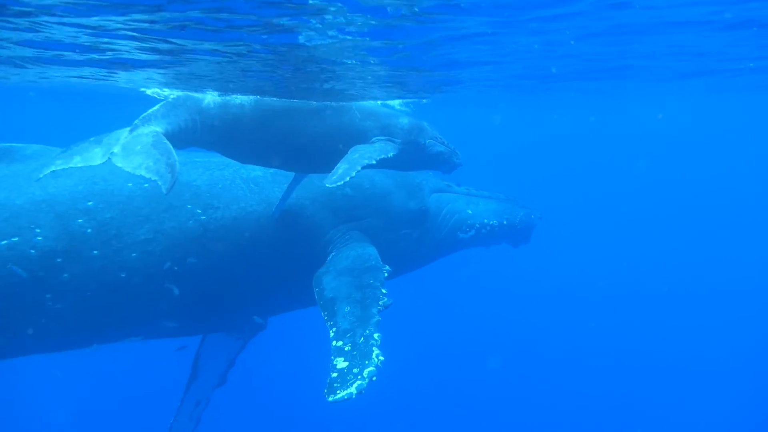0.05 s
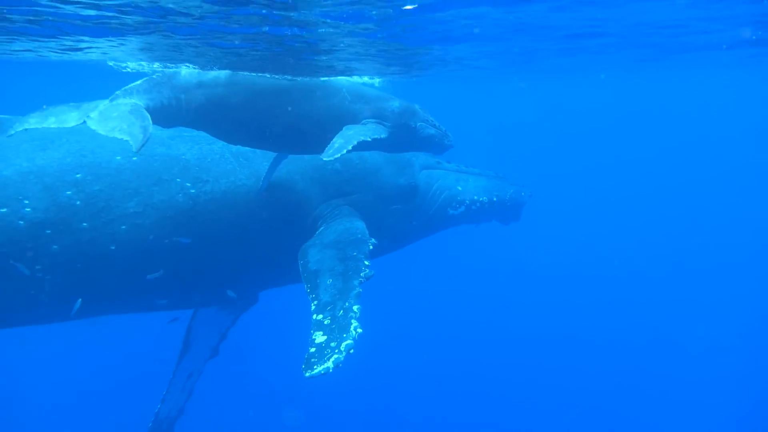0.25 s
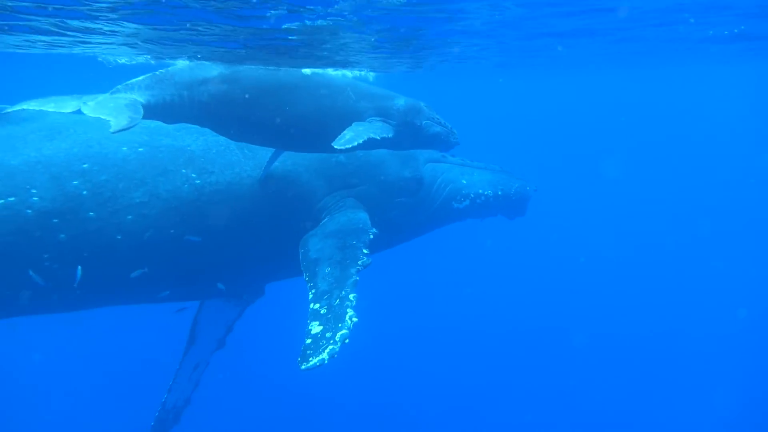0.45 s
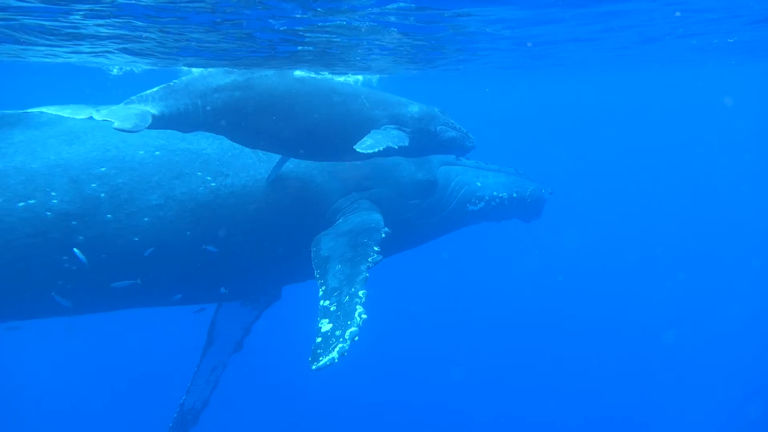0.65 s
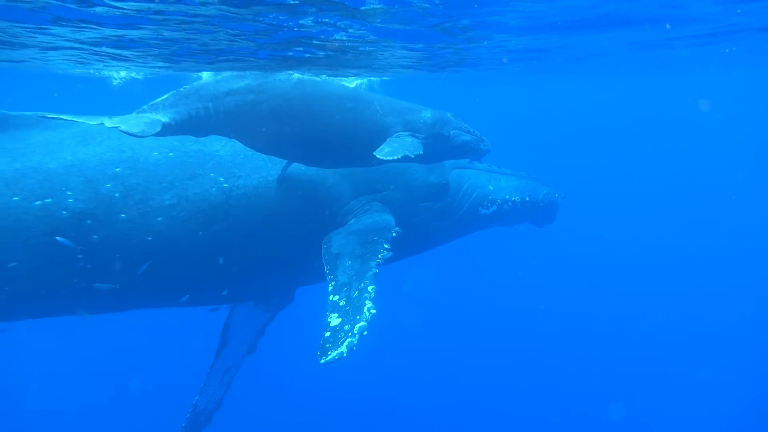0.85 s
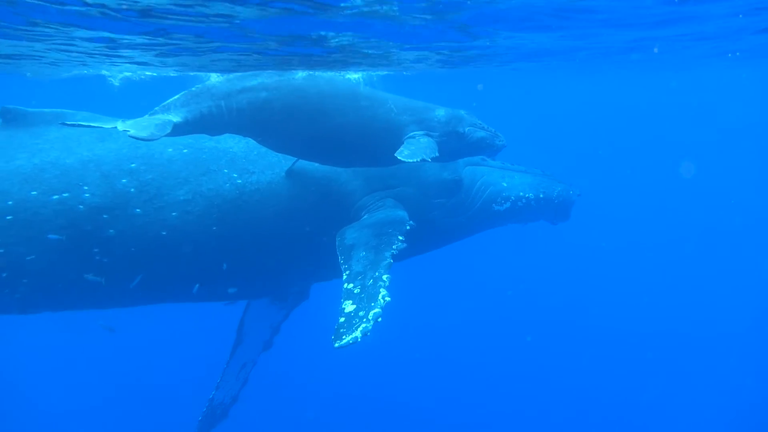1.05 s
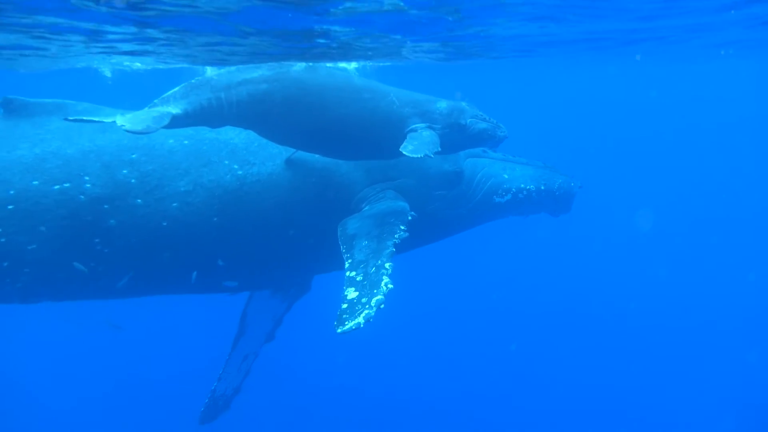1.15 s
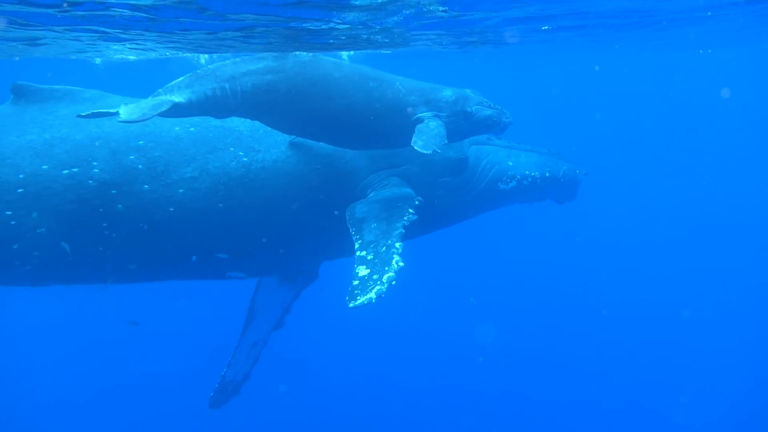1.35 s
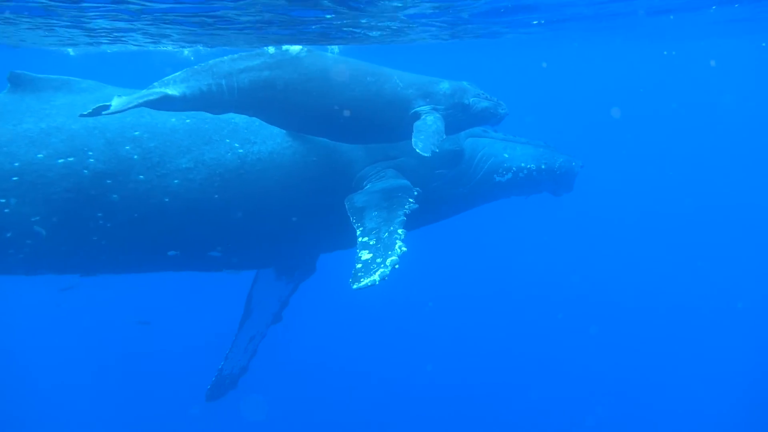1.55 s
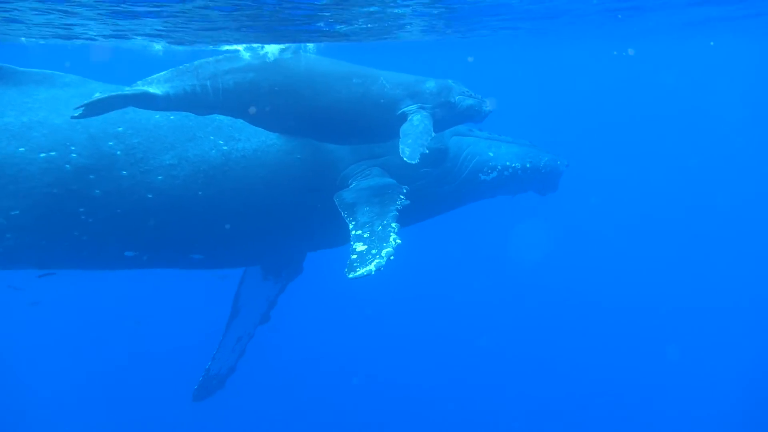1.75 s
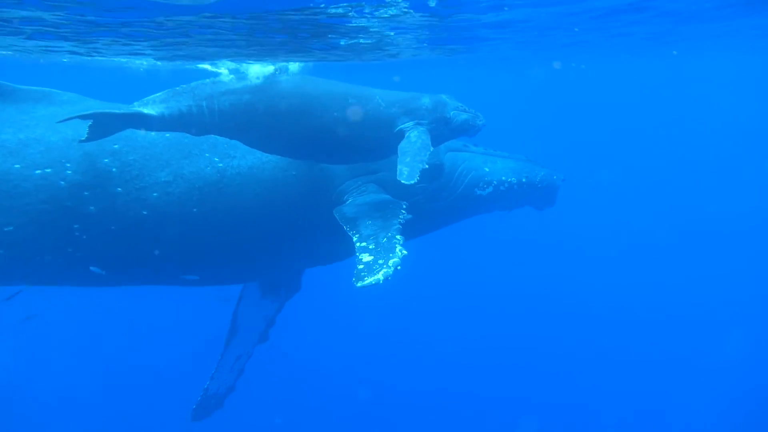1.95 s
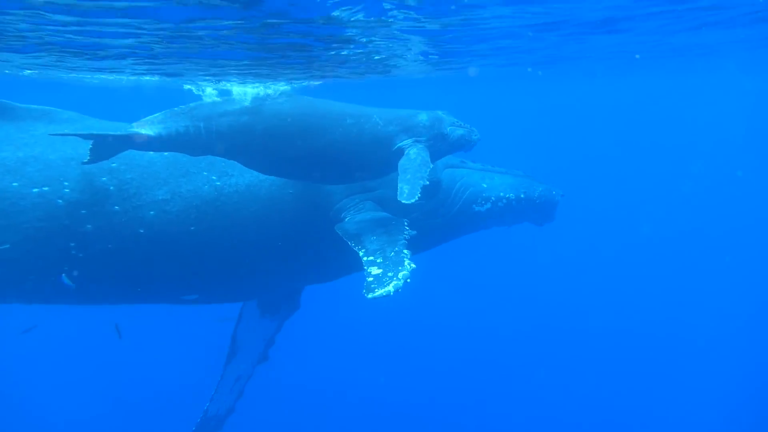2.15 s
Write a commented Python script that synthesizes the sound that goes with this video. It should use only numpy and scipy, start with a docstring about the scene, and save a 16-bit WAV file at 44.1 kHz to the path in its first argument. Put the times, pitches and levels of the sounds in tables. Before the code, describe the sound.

A single humpback whale whoop starts as a low grunt, climbs in steps to a thin high cry and stops, while water sloshes and bubbles softly; heard close underwater with faint shrimp crackle and hiss.

```python
"""One long humpback whale whoop under the sea surface, climbing in steps from a rough grunt to a thin cry.
Water sloshes and bubbles around it, with soft gulps and a faint crackle of snapping shrimp over a hiss.
The whoop is a gliding sine plus resonance-shaped overtones and pulsed noise; delayed copies beat against it.
Water is patchy filtered noise with ringing bubble notes; gulps are band-passed noise bursts.
Shrimp are decaying high-passed noise, as single snaps and as random crackle."""
import sys
import numpy as np
from scipy import signal
from scipy.fft import rfft, irfft
from scipy.io import wavfile
from scipy.ndimage import uniform_filter1d

SR = 44100
rng = np.random.default_rng(int(sys.argv[2]) if len(sys.argv) > 2 else 0)


def wrap_up_sound(samples):
    """Save the sound to the file named by the first command line argument, as 16-bit audio."""
    columns = np.atleast_2d(samples).T
    # keep every value between -1 and 1, then stretch to whole-number steps
    tamed = np.clip(columns, -1, 1)
    steps = np.round(tamed * 32767).astype(np.int16)
    wavfile.write(sys.argv[1], SR, steps)


N = 97020
TIME = np.arange(N) / SR
EDGE_HZ = 15600  # upper band limit

# Sloshing spectrum. Each row: frequency in Hz, relative gain in dB.
SLOSH_SPECTRUM = [(35, -44), (60, -33), (336, -16), (373, -4.5), (415, -14.5), (453, -5), (530, -3.5),
                  (715, -6.5), (883, -18.5), (1020, -1), (1370, -18.5), (1470, -17), (1580, -28),
                  (1810, -24.5), (2200, -38), (2450, -29.5), (4000, -50), (5200, -48), (8800, -120)]
# Swell and ebb of the sloshing. Each row: time in seconds, level in dB.
SLOSH_LEVEL = [(0, -35.5), (.09, -33.5), (.155, -45), (.2, -33.5), (.28, -35), (.6, -37.5), (1.05, -35.5),
               (1.13, -38), (1.25, -34), (1.31, -37.5), (1.37, -31), (1.45, -40.5), (1.52, -33.5),
               (1.59, -39), (1.7, -34.5), (1.735, -42.5), (1.78, -36), (1.87, -39.5), (1.915, -34.5),
               (1.965, -47.5), (2.0, -35.5), (2.07, -36.5), (2.2, -37)]
# Left-right likeness of the water. Each row: frequency in Hz, correlation (-1 to 1).
SLOSH_LIKENESS = [(60, -.3), (150, 0), (300, 0), (550, 0.49), (1000, -.35), (1600, 0.15), (3000, 0)]
SLOSH_PAN_DB, PATCH_RMS_DB, FLICKER_RMS_DB = -0.74, 2, 1
BUBBLE_DB, BUBBLES_PER_S, BUBBLE_CYCLES = -8.5, 400, 12  # dB relative to the churn

# Steady hiss of the open sea. Each row: frequency in Hz, relative gain in dB.
HISS_SPECTRUM = [(20, 11), (60, 6), (300, -0.5), (3000, 2), (3400, -4.5), (3520, 4.5), (3590, 15.5),
                 (3680, 3), (4500, 3.5), (7000, 7.5), (9500, 4.5), (12000, -2.5), (15000, -7.5),
                 (15700, -5.5)]
HISS_DB, HISS_LIKENESS, HISS_PAN_DB = -64, .4, 0.9
# Near shrimp snaps. Each row: start in seconds, level in dB before SNAP_TRIM_DB, ring in Hz,
# left over right in dB.
SNAPS = [(0.3534, -46, 8400, 4), (0.6358, -37.5, 9130, 2.0), (1.5915, -41, 10300, 6), (1.755, -50, 8840, 3),
         (1.8587, -47.5, 7800, 1.0), (1.9495, -53, 5500, 3.0), (2.021, -47, 7700, 3.0),
         (2.1058, -45, 6850, 2.0)]
SNAP_TRIM_DB, SNAP_DECAY_S, SNAP_RING_GAIN = -7.5, 0.0027, 1
CRACKLE_DB, CRACKLE_PER_S = -73.5, 190

# Gulps and small splashes. Each row: start in seconds, level in dB, centre in Hz,
# length in seconds (twice the rise time).
GULPS = [(0.181, -48, 1100, 0.026), (0.234, -37, 292, 0.034), (1.052, -44, 253.7, 0.046),
         (1.744, -48, 1240, 0.011), (1.779, -57, 2230, 0.04), (1.99, -41, 1300, 0.019),
         (2.144, -41.5, 340, 0.031)]

# Whoop fundamental. Each row: time in seconds, pitch in Hz, level in dB.
CALL = [(0.2, 150.6, -55), (0.3, 193.7, -52), (0.35, 216.5, -33.0), (0.4, 278, -35.5), (0.44, 286.8, -35.5),
        (0.48, 316.1, -28.5), (0.53, 321.1, -30.0), (0.6, 320.8, -29.5), (0.65, 354.6, -24.5),
        (0.69, 411.6, -24.5), (0.73, 472.2, -22.5), (0.77, 593, -28.5), (0.8, 614, -22.5),
        (0.86, 645.3, -23.5), (0.93, 682.7, -21), (0.96, 751.2, -38.5), (1.0, 838.4, -32.5),
        (1.05, 990, -36.5), (1.08, 996, -66)]
# Throaty second harmonic early in the whoop. Each row: time in seconds, level in dB.
THROAT = [(.24, -55.5), (.3, -44.5), (.37, -35), (.41, -48.5), (.46, -60)]
# Upper voice. Each row: time in seconds, clean overtone level in dB, rasp level in dB, treble lift
# (dB per octave above 2.5 kHz for overtones, dB above 4 kHz for rasp).
UPPER_VOICE = [(.18, -94, -64, 12), (.27, -65.5, -49, 6), (.37, -41.5, -45, -34), (.43, -49, -40, -2),
               (.5, -45.5, -51.5, 1.5), (.61, -42, -50, -4.5), (.66, -48.5, -48.5, -0.5),
               (.72, -42, -47.5, 3), (.76, -48.5, -48, -6), (.81, -35, -60.5, -14.5),
               (.87, -40.5, -51.5, -7.5), (.93, -46.5, -49.5, -4.5), (1.0, -37, -47.5, -4),
               (1.05, -53, -49, 5), (1.1, -72, -57, 16)]
# Resonances of the whale's air spaces. Each row: frequency in Hz, gain in dB.
BODY_RESONANCES = [(60, -41.5), (150, -10), (300, -6), (460, 3.5), (650, -5.5), (1000, -8), (1300, -7),
                   (1450, -0.5), (1750, -14.5), (2050, -41), (2280, -13.5), (2400, -12), (2500, -1),
                   (2620, -12.5), (2760, -17), (2930, -13), (3100, -22.5), (3330, -44.5), (3560, -20.5),
                   (3900, -42), (4700, -35), (5250, -24), (5900, -39), (7000, -31.5), (9000, -41),
                   (12000, -51.5)]
# Echo paths. Each row: delay in seconds, gain (negative: the surface turns the wave over).
ECHOES = [(0.0194, -0.29), (0.0221, 0.43), (0.0237, -0.31), (0.03456, -0.21), (0.04164, 0.13),
          (0.04453, 0.17), (0.04714, 0.29)]
TONE_PAN_DB, OVERTONE_PAN_DB, OVERTONE_ECHO_GAIN = -4, -6.5, .5
JITTER_CYCLES = 0.014  # rms phase wander where rasp is at least as loud as the clean overtones
ECHO_FADE_HZ, ECHO_LOSS_DB_PER_OCTAVE = 740, 11.5  # the rippled surface mirrors high notes less well
TAIL_DB, TAIL_T60_S = -17, .3
SQUEAK_AT_S, SQUEAK_LENGTH_S, SQUEAK_DB = .706, .013, -33
SQUEAK_HZ, SQUEAK_GLIDE_HZ_PER_S = 2590, 5000


def amp(db):
    """Decibels to gain."""
    return 10 ** (np.asarray(db) / 20)


def unit(x):
    """Scales to rms 1."""
    return x / np.sqrt(np.mean(x ** 2) + 1e-20)


def at_hz(points, hz):
    """Reads a spectrum on a log-frequency axis."""
    f, value = np.transpose(points)
    return np.interp(np.log(hz + 1), np.log(f), value)


def curve(rows, axis=1):
    """One column of a timed table, sample by sample."""
    rows = np.array(rows)
    return np.interp(TIME, rows[:, 0], rows[:, axis])


def pan(db):
    """Left and right gains for a level difference, left over right."""
    return amp(np.array([[db], [-db]]) / 2)


def colour(x, points):
    """Filters by a spectrum."""
    return irfft(rfft(x) * amp(at_hz(points, np.fft.rfftfreq(N, 1 / SR))), N)


def add(mix, start_s, sound):
    """Mixes a stereo sound in at a time."""
    part = mix[:, round(start_s * SR):][:, :sound.shape[1]]
    part += sound[:, :part.shape[1]]


def pair(z, likeness):
    """Left and right of a given correlation, from two unrelated signals."""
    likeness = np.clip(likeness, -1, 1)
    mid = np.sqrt((1 + likeness) / 2) * z[0]
    side = np.sqrt((1 - likeness) / 2) * z[1]
    return np.array([mid + side, mid - side])


def churn():
    """Noise whose level varies in patches of time and frequency."""
    frames, bins = N // 128 + 5, 257
    hz = np.fft.rfftfreq(512, 1 / SR)
    z = rng.standard_normal((2, frames, bins)) + 1j * rng.standard_normal((2, frames, bins))
    patches = uniform_filter1d(rng.standard_normal((frames, bins)), 9, axis=0)
    patches = unit(uniform_filter1d(patches, 7, axis=1))
    spectra = pair(z, at_hz(SLOSH_LIKENESS, hz)) * amp(PATCH_RMS_DB * patches)
    return signal.istft(spectra, nperseg=512, noverlap=384, time_axis=1, freq_axis=2)[1][:, :N]


def bubbles():
    """Random bubble notes: damped sines, lower notes ringing longer."""
    out, t = np.zeros((2, N)), TIME[:2048]
    notes_hz = np.linspace(300, 2800, 36)
    for hz in notes_hz:
        starts = rng.random(N) < BUBBLES_PER_S / len(notes_hz) / SR
        pops = starts * amp(2.4 * np.minimum(rng.exponential(1, N), 3))
        envelope = np.exp(-2 * hz * t / BUBBLE_CYCLES) * (1 - np.exp(-hz * t))
        ring = np.sqrt(hz) * np.sin(2 * np.pi * hz * t) * envelope
        sides = pair(rng.choice([-1., 1.], 2), at_hz(SLOSH_LIKENESS, hz))
        out += sides[:, None] * signal.oaconvolve(pops, ring)[:N]
    return out


def slosh():
    """Churning surface and bubble notes, swelling and ebbing together with a slight flicker."""
    churning = unit(colour(churn(), SLOSH_SPECTRUM))
    bubbling = unit(colour(bubbles(), SLOSH_SPECTRUM))
    water = unit(churning + amp(BUBBLE_DB) * bubbling)
    flicker = uniform_filter1d(rng.standard_normal(N), size=400)
    flicker = unit(uniform_filter1d(flicker, size=300))
    return pan(SLOSH_PAN_DB) * amp(curve(SLOSH_LEVEL) + FLICKER_RMS_DB * flicker) * water


def shrimp():
    """A few near snaps, a sparse far crackle and the hiss that countless others merge into."""
    snaps, t = np.zeros((2, N)), TIME[:600]
    high = signal.butter(2, 4500, "high", fs=SR, output="sos")
    for start_s, db, hz, side_db in SNAPS:
        crack = signal.sosfilt(high, pair(rng.standard_normal((2, len(t))), HISS_LIKENESS))
        crack = crack + SNAP_RING_GAIN * np.sin(2 * np.pi * hz * t)
        add(snaps, start_s, pan(side_db) * amp(db + SNAP_TRIM_DB) * crack * np.exp(-t / SNAP_DECAY_S))
    starts = rng.random(N) < CRACKLE_PER_S / SR
    far = starts * amp(12 * np.minimum(rng.exponential(1, N), 3.5))
    envelope = signal.oaconvolve(far, np.exp(-t / SNAP_DECAY_S))[:N]
    bursts = envelope * pair(rng.standard_normal((2, N)), HISS_LIKENESS)
    crackle = unit(colour(signal.sosfilt(high, bursts), HISS_SPECTRUM))
    hiss = unit(colour(pair(rng.standard_normal((2, N)), HISS_LIKENESS), HISS_SPECTRUM))
    return snaps + pan(HISS_PAN_DB) * (amp(CRACKLE_DB) * crackle + amp(HISS_DB) * hiss)


def gulps():
    """Quickly fading band-passed bursts of moving water."""
    out, t = np.zeros((2, N)), TIME[:SR // 4]
    for start_s, db, hz, length_s in GULPS:
        band = signal.butter(2, [hz / 1.23, hz * 1.29], "band", fs=SR, output="sos")
        noise = pair(rng.standard_normal((2, len(t))), at_hz(SLOSH_LIKENESS, hz))
        burst = unit(signal.sosfilt(band, noise))
        u = 2 * t / length_s
        add(out, start_s, amp(db) * burst * u * np.exp(1 - u))
    return pan(SLOSH_PAN_DB) * out


def overtones(phase, hz, lift_db):
    """Harmonics 2 to 35, lighting up as they cross the body's resonances; jittery where raspy."""
    rough = amp(np.minimum(curve(UPPER_VOICE, axis=2) - curve(UPPER_VOICE), 0))
    wander = unit(uniform_filter1d(rng.standard_normal(N), 200))
    shaky = phase + 2 * np.pi * JITTER_CYCLES * wander * rough
    stack = np.zeros(N)
    for k in range(2, 36):
        octaves = np.clip(np.log2(k * hz / 2500), 0, 1.2)
        gain = amp(at_hz(BODY_RESONANCES, k * hz) + lift_db * octaves)
        stack += gain * (k * hz < EDGE_HZ) * np.cos(k * shaky)
    return np.sqrt(2) * stack


def rasp(phase, lift_db):
    """Noise puffs, one per cycle of the fundamental, through the body's resonances."""
    puffs = unit(colour(rng.standard_normal(N) * (1 + 0.98 * np.cos(phase)), BODY_RESONANCES))
    high = signal.butter(4, 4000, "high", fs=SR, output="sos")
    return puffs + (amp(lift_db) - 1) * signal.sosfiltfilt(high, puffs)


def squeak():
    """A short rising blip inside the whoop, near the main upper resonance."""
    t = TIME - SQUEAK_AT_S
    envelope = np.exp(-(2 * t / SQUEAK_LENGTH_S) ** 2)
    blip = envelope * np.sin(2 * np.pi * (SQUEAK_HZ + SQUEAK_GLIDE_HZ_PER_S * t / 2) * t)
    return np.sqrt(2) * amp(SQUEAK_DB) * blip


def echoes(x):
    """Sum of the delayed paths through the water."""
    return sum(gain * np.interp(TIME - delay_s, TIME, x, left=0) for delay_s, gain in ECHOES)


def scatter(x):
    """Faint diffuse tail from the rippled surface: decaying noise as impulse response."""
    t = TIME[:SR // 2]
    tail = rng.standard_normal((2, len(t))) * amp(-60 * t / TAIL_T60_S) * np.minimum(t / 0.09, 1)
    return amp(TAIL_DB) * signal.fftconvolve(x[None], tail / np.linalg.norm(tail[0]), axes=1)[:, :N]


def whale():
    """A strong gliding fundamental with overtones and rasp; echoes of the glide beat against it."""
    hz, lift_db = curve(CALL), curve(UPPER_VOICE, axis=3)
    fade_in = np.clip((TIME - CALL[0][0]) / 0.011 + 1, 0, 1)
    fade_out = np.clip((CALL[-1][0] - TIME) / 0.016 + 1, 0, 1)
    sounding = fade_in * fade_out
    phase = 2 * np.pi * np.cumsum(hz) / SR

    fundamental = amp(curve(CALL, axis=2)) * np.sin(phase)
    throat = amp(curve(THROAT)) * np.sin(2 * phase)
    tone = np.sqrt(2) * (fundamental + throat) * sounding
    mirrored = amp(-ECHO_LOSS_DB_PER_OCTAVE * np.maximum(np.log2(hz / ECHO_FADE_HZ), 0))

    clean = amp(curve(UPPER_VOICE)) * overtones(phase, hz, lift_db)
    raspy = amp(curve(UPPER_VOICE, axis=2)) * rasp(phase, lift_db)
    upper = (clean + raspy) * sounding

    low_part = pan(TONE_PAN_DB) * (tone + echoes(tone * mirrored))
    high_part = pan(OVERTONE_PAN_DB) * (upper + OVERTONE_ECHO_GAIN * echoes(upper) + squeak())
    return low_part + high_part + scatter(tone + upper)


def scene():
    """The whale in the sounds of the sea."""
    return slosh() + shrimp() + gulps() + whale()


def record(dry):
    """Linear-phase low-pass at the upper band limit."""
    lowpass = signal.firwin(511, EDGE_HZ, window=("kaiser", 9), fs=SR)
    return signal.oaconvolve(dry, lowpass[None], "same")


dry = scene()
out = record(dry)
wrap_up_sound(out)
```